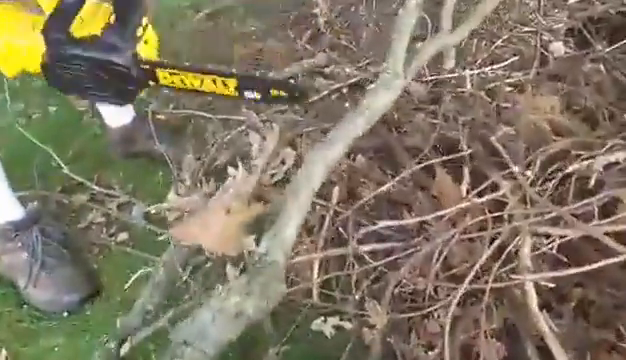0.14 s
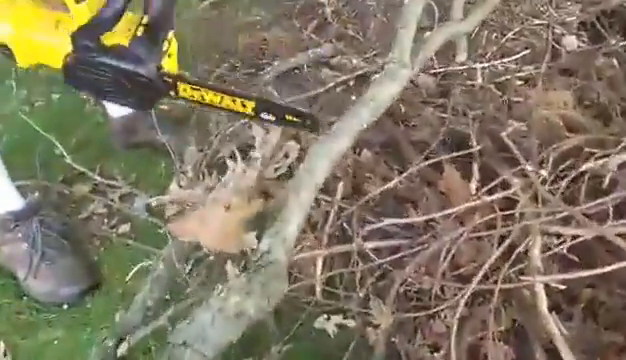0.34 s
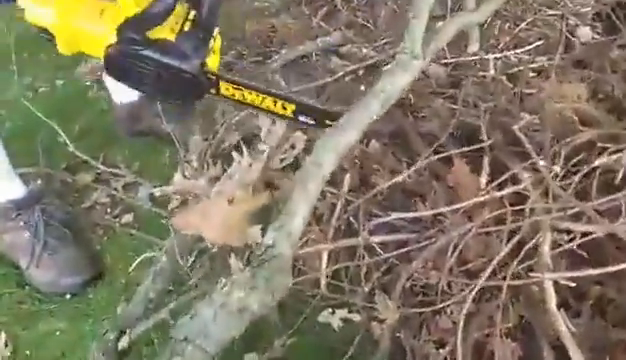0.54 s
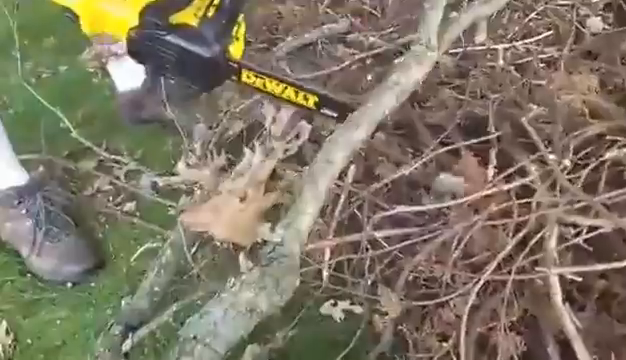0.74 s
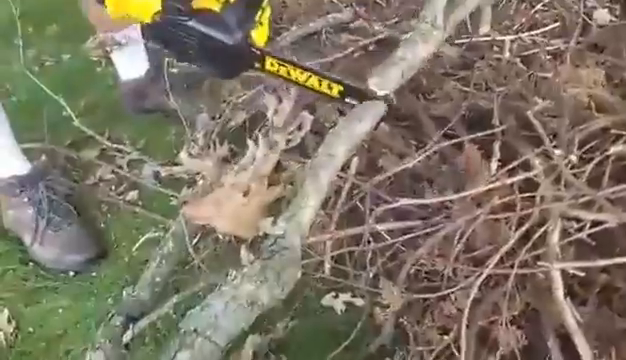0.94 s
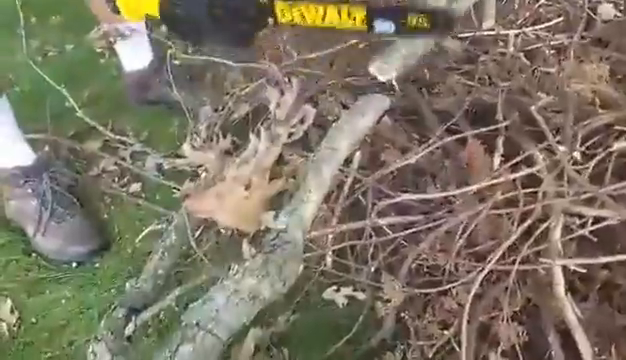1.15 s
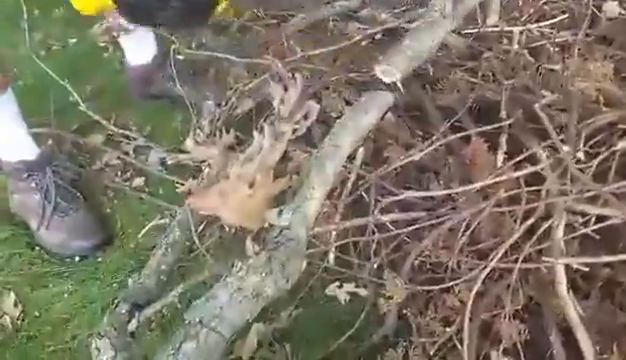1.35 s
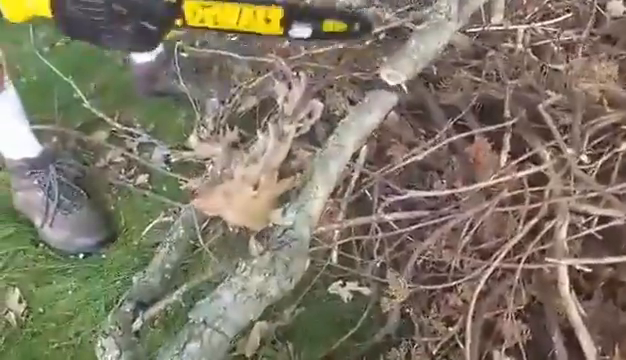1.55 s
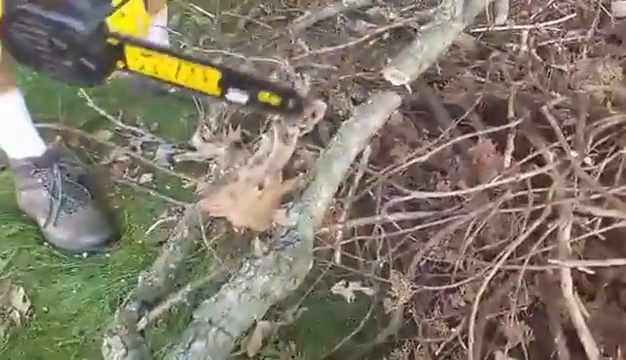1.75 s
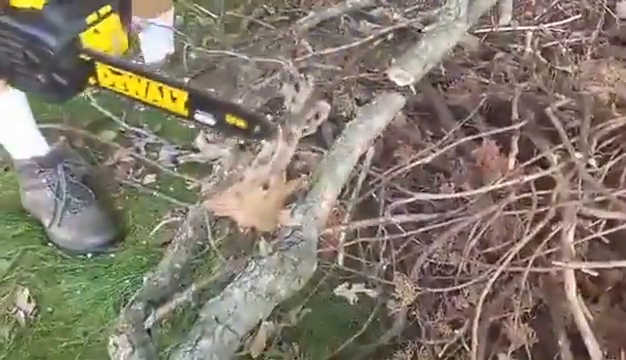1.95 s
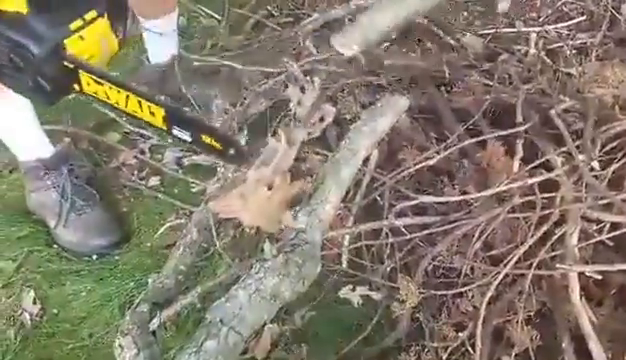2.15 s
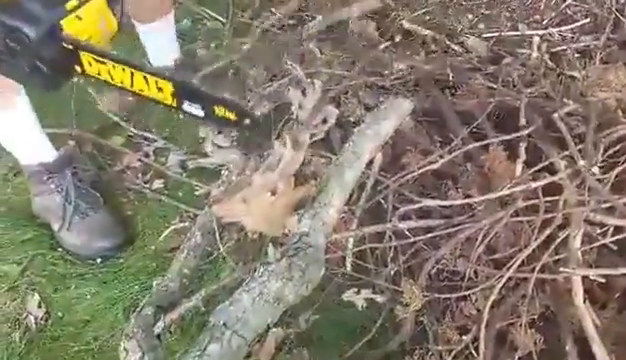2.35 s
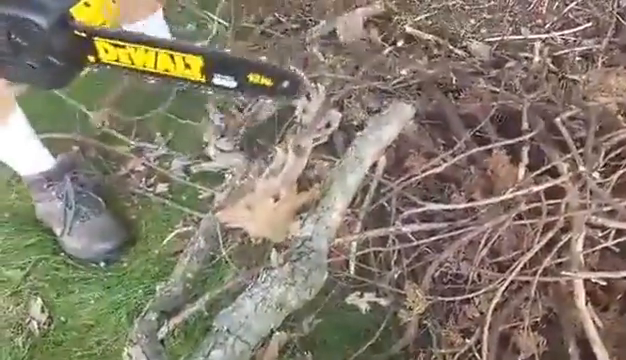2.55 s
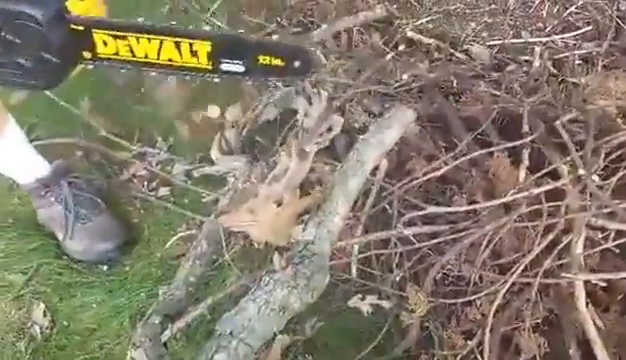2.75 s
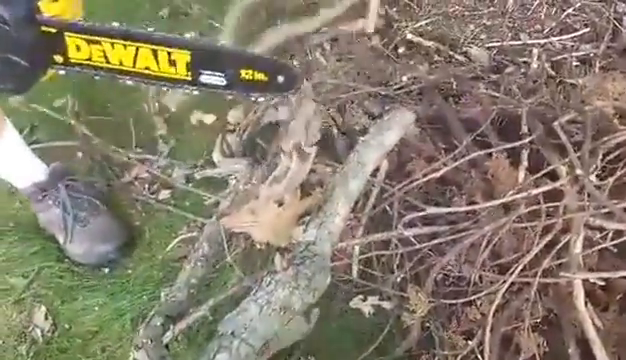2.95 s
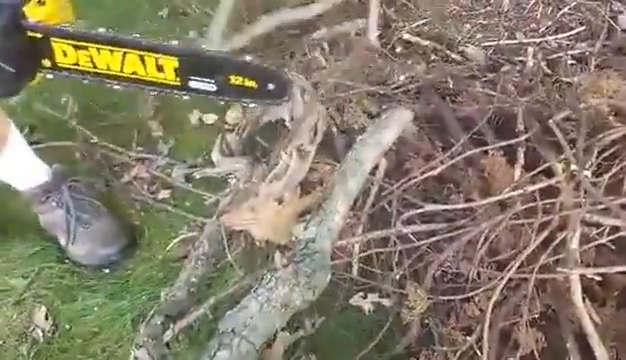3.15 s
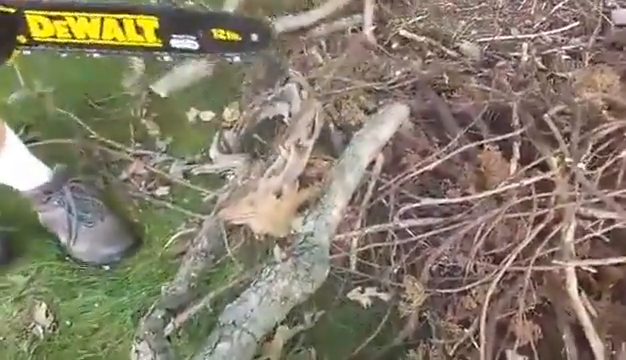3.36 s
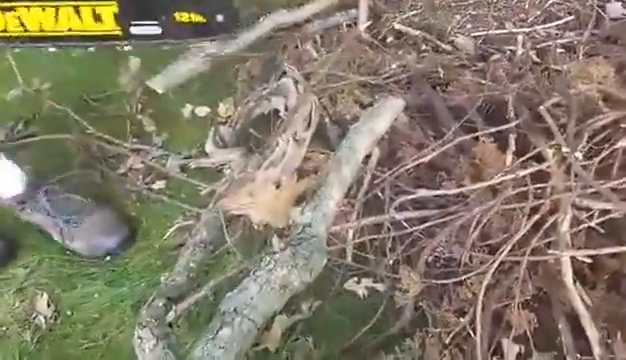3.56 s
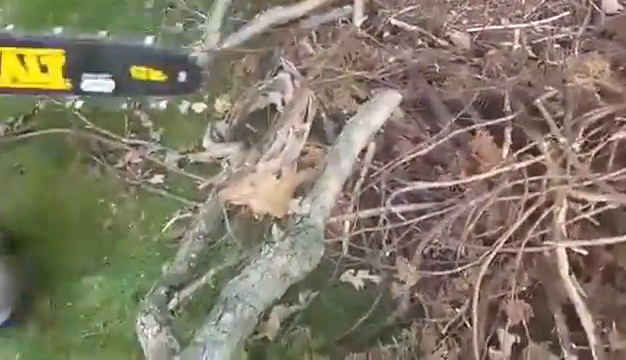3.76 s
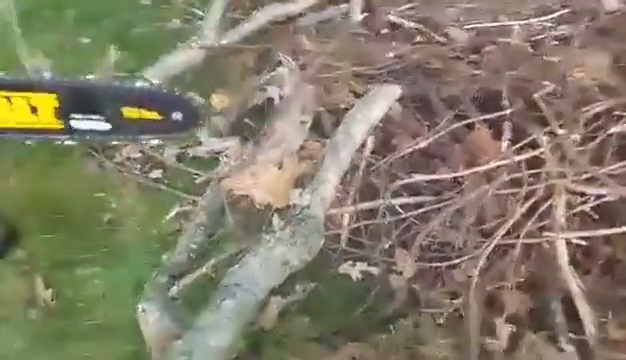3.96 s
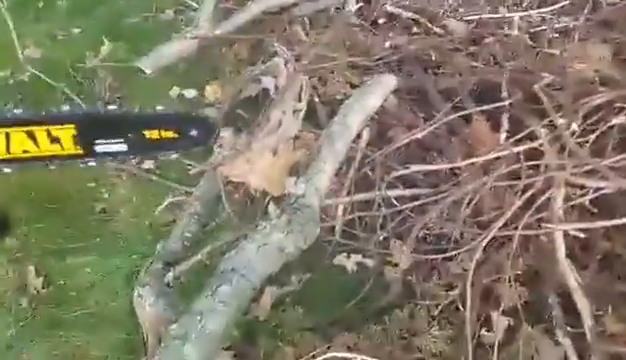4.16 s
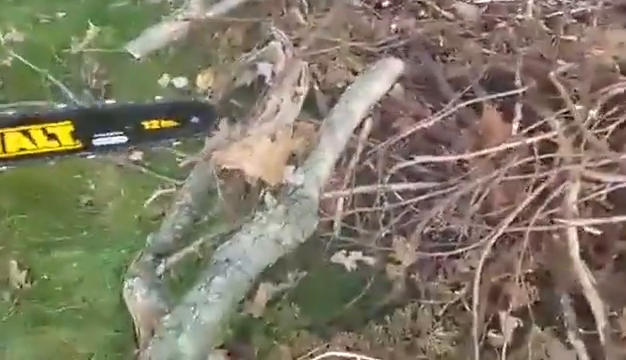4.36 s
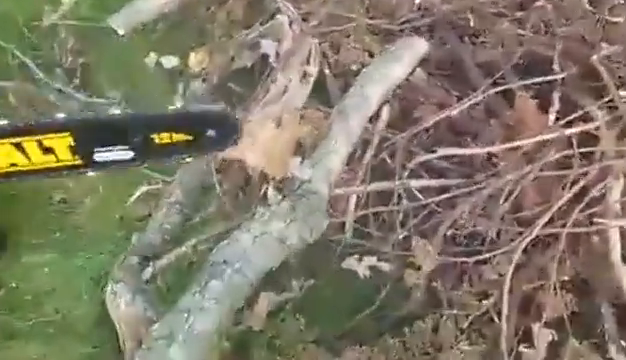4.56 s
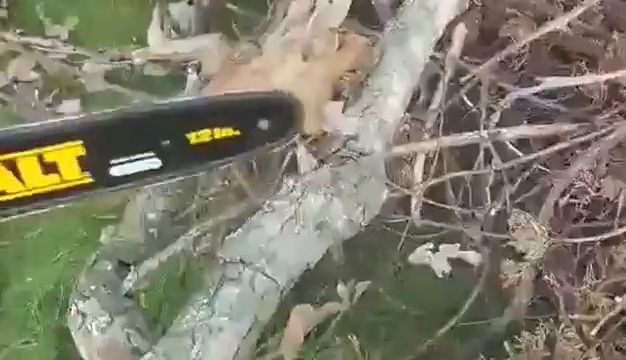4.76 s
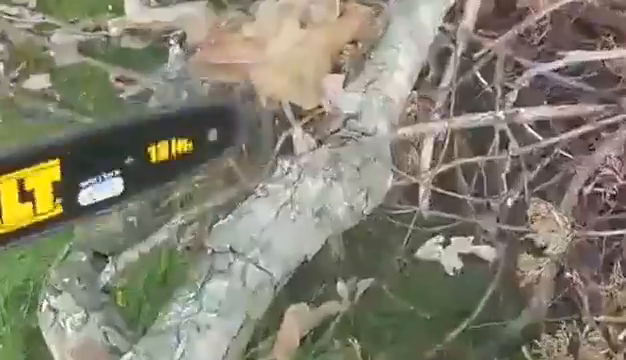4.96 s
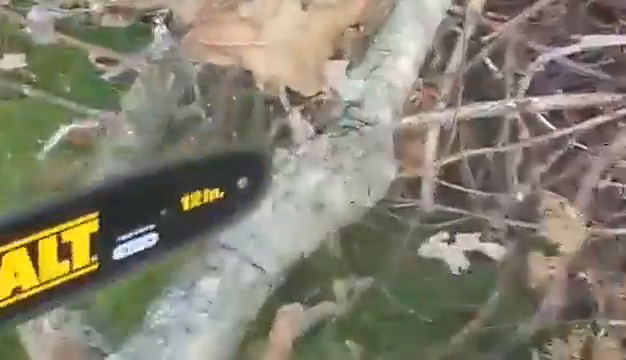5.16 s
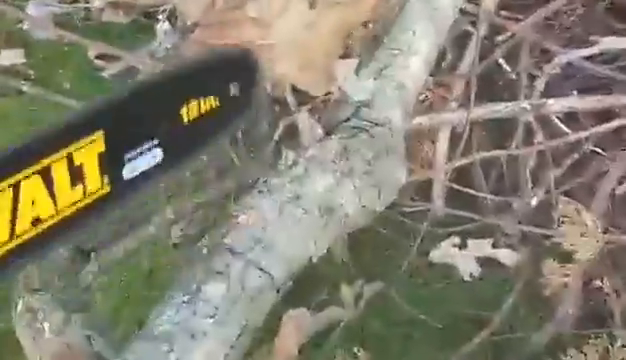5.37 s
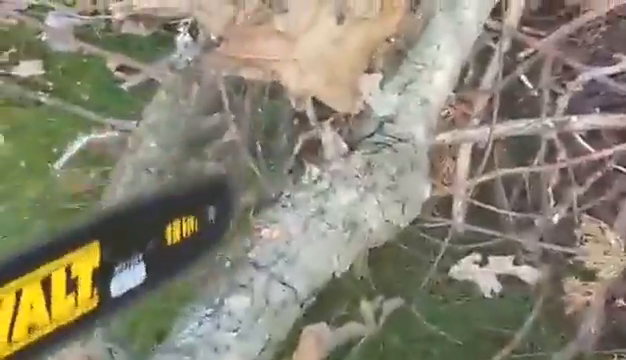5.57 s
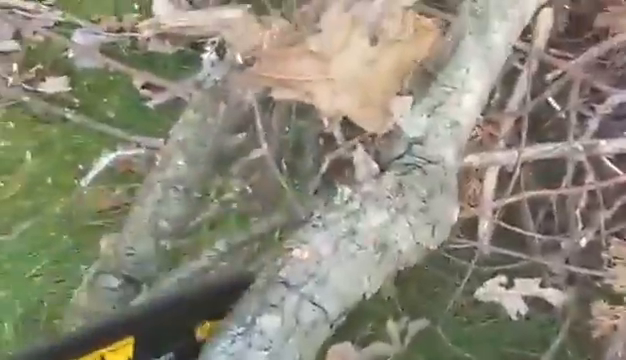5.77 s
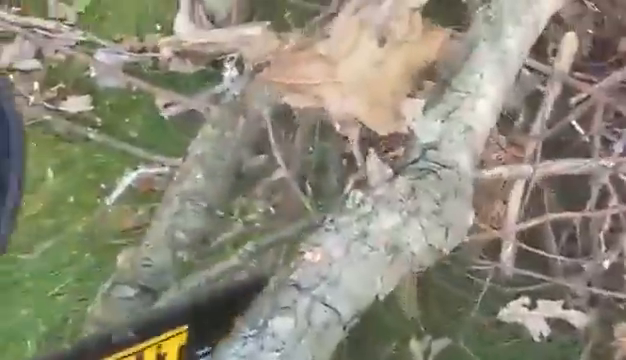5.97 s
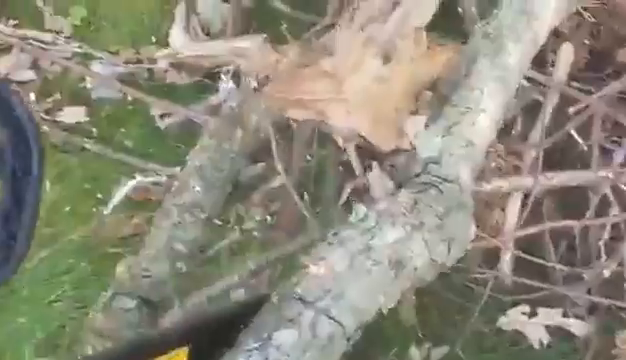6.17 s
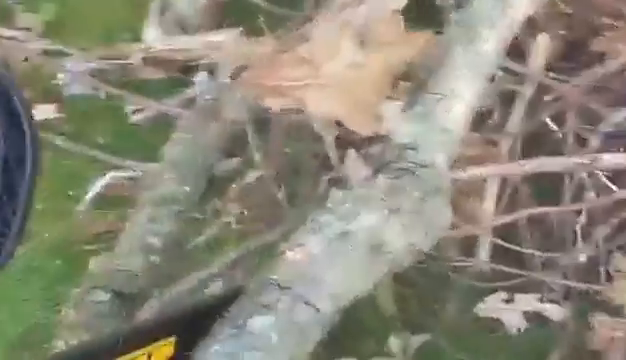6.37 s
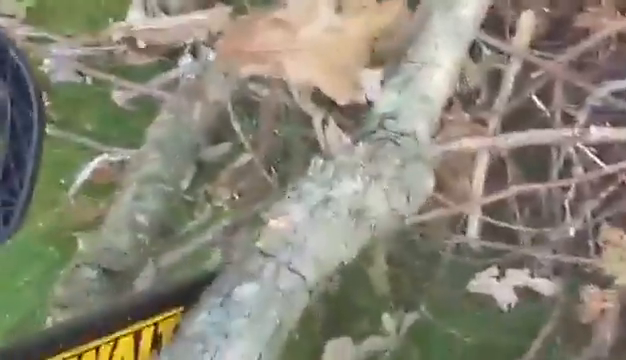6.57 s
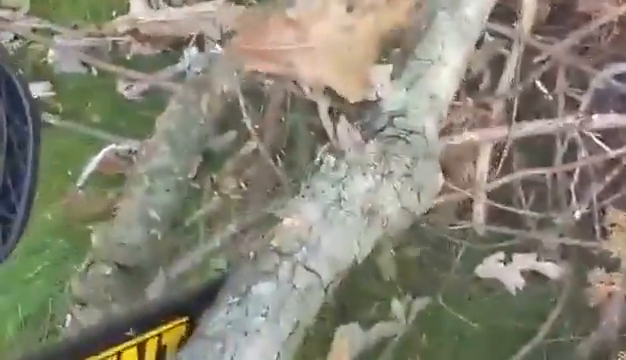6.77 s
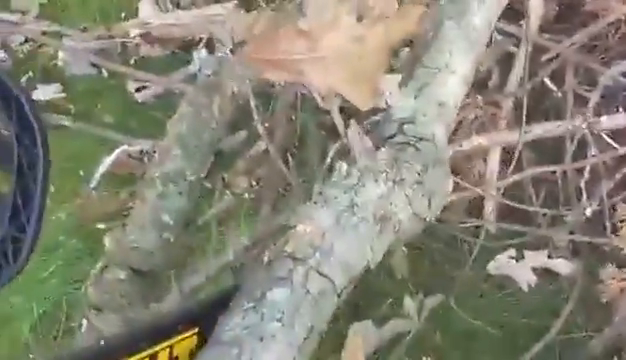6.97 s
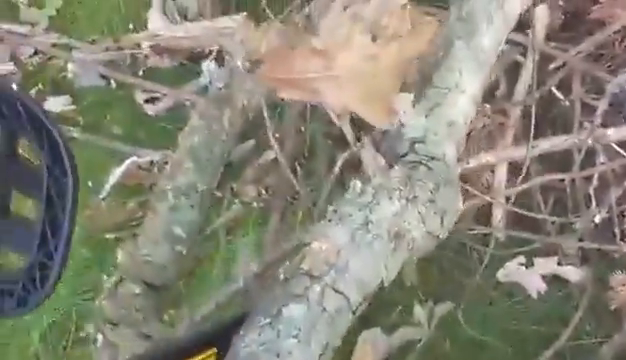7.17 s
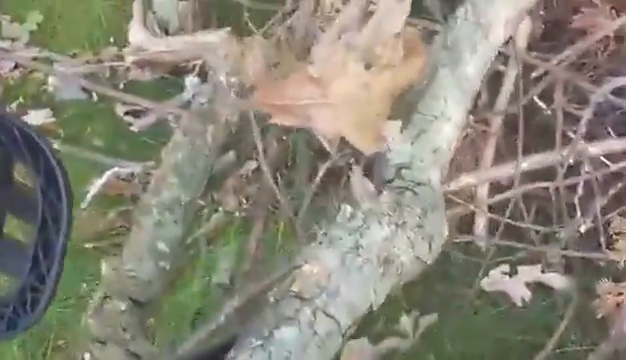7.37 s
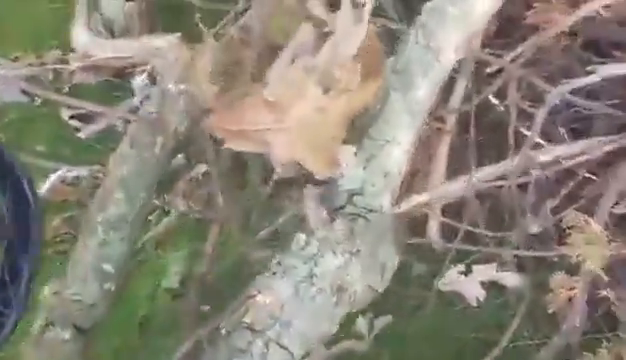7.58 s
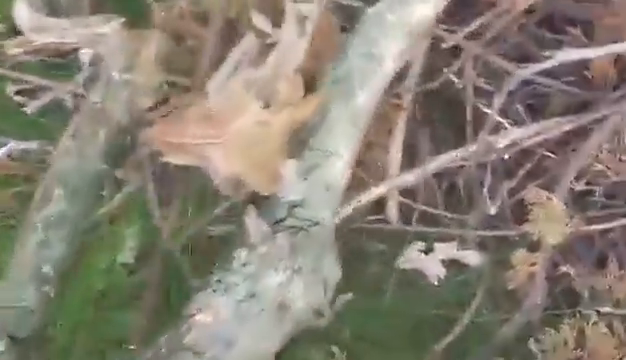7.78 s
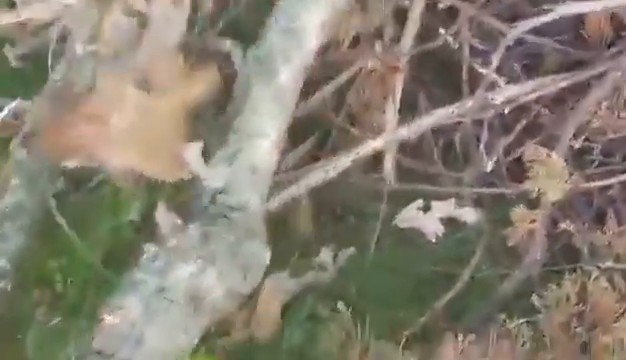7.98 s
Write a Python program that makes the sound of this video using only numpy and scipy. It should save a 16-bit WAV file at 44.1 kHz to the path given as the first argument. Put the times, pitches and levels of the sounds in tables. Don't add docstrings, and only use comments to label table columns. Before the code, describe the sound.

Open yard, close stereo pickup, little reverberation, highest treble missing. Soft traffic rumble and a low distant engine hum lie underneath. At about 0.35 s dry twigs crack. At 0.5 s a battery chainsaw knocks, stutters and runs up in a rising, rattling whine; released at 1.2 s, it falls quickly and stops with a click near 1.5 s. A quiet gap follows with small twig ticks, then from 2.2 to 3.6 s dense dry leaves crunch, a bough scuffs in short swishes, and wood snaps sharply around 2.45 s. Rustling thins, with scattered cracks from 3.9 to 4.8 s. At 4.8 s a hard snap meets the second start: the motor climbs to a steady buzzing whine by 5.5 s. From 5.9 s the chain bites; pitch sags, tone thickens and wavers, with grabbing surges and sharp chip cracks, recovering slightly before ending, still running, at 8 s.

```python
import sys
import numpy as np
from scipy import signal
from scipy.fft import rfft, irfft, next_fast_len
from scipy.io import wavfile
from scipy.ndimage import uniform_filter1d

SR = 44100
rng = np.random.default_rng(int(sys.argv[2]) if len(sys.argv) > 2 else 0)


def put_to_file(sound):
    columns = np.atleast_2d(sound).T
    safe = np.clip(columns, -1, 1)
    whole_steps = np.round(safe * 32767)
    wavfile.write(sys.argv[1], SR, whole_steps.astype(np.int16))


def voltage_ratio(level):
    return 10 ** (np.asarray(level, float) / 20)


N = 353682

FREE_HZ = 354
POLES = 12.2
# (time after the pull [s], motor speed [Hz])
START = [(0, 80), (.03, 73), (.055, 64), (.09, 83), (.125, 133)]


def rms_one(x):
    return x / np.sqrt(np.mean(x ** 2) + 1e-20)


def in_time(rows):
    s, *columns = np.transpose(rows)
    at = np.arange(round(s[0] * SR), min(round(s[-1] * SR), N))
    return at, [np.interp(at / SR, s, c) for c in columns]


def read(points, hz):
    return np.interp(np.log(hz), np.log(np.array(points)[:, 0]), np.array(points)[:, 1])


def at_hz(points, size):
    return read(points, np.arange(size // 2 + 1) * SR / size + 1)


def colour(x, spectrum):
    fold = irfft(np.log(voltage_ratio(at_hz(spectrum, size=4096))))
    fold[1:2048] *= 2
    fold[2049:] = 0
    response = irfft(np.exp(rfft(fold)))[None, :2048]
    return signal.oaconvolve(np.atleast_2d(x), response, axes=1)[:, :np.shape(x)[-1]]


def band(x, lo_hz, hi_hz):
    return signal.sosfilt(signal.butter(2, [lo_hz, hi_hz], "band", fs=SR, output="sos"), x + 1e-18)


def drift(rate_hz, size):
    r = np.exp(-2 * np.pi * rate_hz / SR)
    return rms_one(signal.lfilter([1], [1, -2 * r, r * r], rng.standard_normal(size + 9000))[9000:])


def grains(per_s, spread_db, size):
    sizes = voltage_ratio(spread_db * np.minimum(rng.exponential(1, size), 5)) * rng.choice([-1, 1], size)
    return sizes * (rng.random(size) < per_s / SR)


def place(takes, lag_s):
    # (frequency [Hz], direct share of power [0-1])
    likeness = [(30, 0.38), (200, 0.66), (600, 1), (1500, 0.46), (2500, 0.35), (5000, 0.064), (9000, 0.12)]
    size = next_fast_len(takes.shape[1] + 64)
    share = np.clip(at_hz(likeness, size), 0, 1)
    delay = np.exp(-2j * np.pi * np.arange(size // 2 + 1) * SR / size * np.array([[0], [lag_s]]))
    direct, *scattered = rfft(takes, size)
    both = np.sqrt(share) * delay * direct + np.sqrt(1 - share) * np.array(scattered)
    return irfft(both, size)[:, :takes.shape[1]]


def yard():
    # (frequency [Hz], density [dB per Hz])
    rumble = [(12, -13), (20, -29), (58, -11.5), (76, -12), (96, -6), (155, -4.5), (213, -5.5), (286, -7.5),
              (585, -21.5), (744, -21.5), (805, -22), (2810, -28.5), (11500, -69), (15000, -104),
              (22000, -120)]
    # (time [s], level [dB], half-length [s])
    swells = [(0.703, 5, 0.44), (1.998, 1, 0.25), (3.212, 6, 0.8)]
    # (start [s], end [s], from [Hz], to [Hz], level [dB])
    first_engine = [(0.0, 1.143, 96.5, 96.3, -47), (1.14, 2.227, 93.4, 92.5, -48),
                    (2.101, 2.9, 88.7, 85.4, -48.5)]
    second_engine = [(2.7, 3.102, 136.3, 114.3, -43.5), (3.45, 4.19, 132.5, 130, -46),
                     (3.9, 4.995, 131.2, 134.5, -48.5)]
    # (multiple [1], level [dB])
    hum_overtones = [(1.651, -3.5), (2.002, -20), (8.05, -16)]
    yard_db, fall_from_s, fall_db_per_s, engine_fade_s = -40.5, 4.6, 1.3, 0.13

    t = np.arange(N) / SR
    level_db = yard_db - fall_db_per_s * np.maximum(t - fall_from_s, 0)
    level_db += sum(db * np.exp(-((t - s) / half_s) ** 2) for s, db, half_s in swells)
    takes = rms_one(colour(rng.standard_normal((3, N)), rumble)) * voltage_ratio(level_db - 8.5)
    for rows, overtones in zip((first_engine, second_engine), (hum_overtones, [])):
        for start, end, from_hz, to_hz, hum_db in rows:
            at, (hz,) = in_time([(start, from_hz), (end, to_hz)])
            fade = np.clip(np.minimum(at / SR - start, end - at / SR) / engine_fade_s, 0, 1)
            turn = 2 * np.pi * np.cumsum(hz + 0.74 * drift(10.3, len(at))) / SR
            for multiple, db in [(0.98, 0)] + overtones:
                level = voltage_ratio(hum_db + db + 0.63 * drift(5.1, len(at)))
                takes[0, at] += np.sqrt(2) * fade * level * np.sin(multiple * turn)
    return place(takes, .00002)


def leaves():
    # (time [s], level [dB])
    rustle = [(0.0, -52.5), (.5, -56.5), (1.46, -63), (1.9, -70), (2.1, -58), (2.2, -49.5), (2.32, -45.5),
              (2.43, -37.5), (2.77, -36.5), (2.805, -37), (2.82, -43), (2.845, -42), (2.86, -36),
              (2.96, -39), (3.0, -42.5), (3.1, -37.5), (3.37, -39), (3.63, -50), (3.75, -63), (4.05, -52.5),
              (4.21, -61), (4.44, -67.5), (4.69, -64), (4.83, -48)]
    # (frequency [Hz], density [dB per Hz])
    leaf = [(150, -13), (300, -33), (450, 1), (600, -7), (850, -4), (1100, -7.5), (1450, -3), (1900, -5),
            (2300, -3.5), (2900, -6), (3600, -6), (4800, -4), (6000, 0), (7900, -6.5), (11000, 0.5)]
    out = np.zeros((2, N))
    at, (level_db,) = in_time(rustle)
    size = (3, len(at))
    clumps = voltage_ratio(1.1 * drift(35, len(at)))
    crackle = 0.58 * rms_one(grains(2500 * clumps, 3.0, size)) + 0.63 * rng.standard_normal(size)
    takes = rms_one(band(colour(crackle * clumps, leaf), 610, 6840))
    out[:, at] += place(takes * voltage_ratio(level_db + 4.0), -0.000062)
    return out


def scuffs():
    # (time [s], half-length [s], pitch [Hz], level [dB])
    swishes = [(2.52, .03, 5500, -41), (2.77, .015, 6000, -38), (2.865, .02, 6000, -39),
               (2.94, .02, 6200, -39), (3.152, .016, 2200, -33), (3.21, .03, 2300, -34),
               (3.28, .025, 2500, -38), (3.41, .025, 2500, -41), (3.15, .04, 5600, -41),
               (2.25, .05, 2400, -46)]
    ratio = 1.3
    out, t = np.zeros((2, N)), np.arange(-6000, 6000) / SR
    for (s, half_s, hz, db), noise in zip(swishes, rng.standard_normal((len(swishes), 2, 12000))):
        swish = np.exp(-(t / half_s) ** 2) * rms_one(band(noise, hz / ratio, hz * ratio))
        out[:, round(s * SR) - 6000:][:, :12000] += voltage_ratio(db) * swish
    return out


def snaps():
    # (time [s], peak [dB], brightness [dB], pan [dB]); the first table holds dry twigs and the clacks
    # of trigger, clutch and brake at 0.404, 1.417, 1.453 and 4.821 s
    dry_hits = [(.352, -26, -7.5, -5), (.404, -20.5, -18, 2), (1.417, -21, -28, -5),
                (1.453, -21, -32, -13), (2.16, -33, -2, -4), (2.175, -23, -18, -6), (2.449, -14, -20, 0),
                (2.598, -50, -19, 3), (4.435, -25, -33, -14), (4.72, -15.5, -13.5, -0.5),
                (4.821, -6, -42, -4)]
    twigs = [(.193, -42, -7, 15), (1.951, -40, -16, 21), (1.986, -27.5, -9.5, 5), (2.141, -38, 1, -6),
             (2.331, -24, -25, -6), (2.779, -19, -8, -2.2), (3.856, -27.5, -11.5, -5),
             (3.887, -31, -4.5, -3), (3.96, -15.5, -15, -9), (3.971, -25.5, -23, -32), (4.201, -41, -9, 11),
             (4.635, -33.5, -7, -1), (3.399, -30, -12, 0), (3.53, -35, -15, 3), (4.428, -22.5, -24, -8),
             (4.782, -45, 5, -1), (4.805, -43, -27, 14)]
    bumps = [(.514, -36, -24, -1.2), (1.504, -41, -35, 4), (3.981, -22.5, -26, 7), (4.139, -31.5, -15, 5),
             (4.165, -21.5, -20, 2), (4.693, -28.5, -19, 1)]
    crunches = [(1.7, -40, -10, -5), (2.38, -19.5, -14, -5), (2.501, -26, -1, -7), (2.642, -18.5, -9, -2),
                (2.764, -19, -7, -5), (2.847, -16.5, -7.5, -2), (2.938, -23, -2, -1.2), (3.472, -21, -5, 0),
                (3.998, -26, -3, -4)]
    ticks = [(4.305, -31, -8, 14), (4.437, -14.5, -26, 1.9), (4.494, -30.5, -16, 12),
             (4.561, -16, -16, 16.5)]
    chips = [(5.9167, -19, -14, 0), (6.042, -22, -14, 0), (6.065, -18, -11, 0), (6.3854, -11, -9, -3),
             (6.4471, -9, -14, -4), (6.5722, -14, -14, -2), (6.594, -6, -21, 0), (6.706, -14, -20, -8),
             (6.7823, -7, -22, -3), (6.9492, -17, -20, 0), (7.0118, -14, -17, 0), (7.138, -20, -14, -3),
             (7.2572, -8, -16, 0), (7.2888, -14, -14, -5), (7.8753, -17, -10, 0)]
    # (hits, thump [dB], t60 [ms])
    kinds = [(dry_hits, -29, 23), (twigs, -17, 22), (bumps, -8, 27), (crunches, -23, 110),
             (ticks, -20.5, 4), (chips, -32, 22)]
    creak_s, creak_db = .008, -19
    spike = 9

    out, t = np.zeros((2, N + 4000)), np.arange(4000) / SR - creak_s
    events = [(*hit, thump_db, ms) for hits, thump_db, ms in kinds for hit in hits]
    noise = rng.standard_normal((len(events), 2, 4000))
    for (s, peak_db, bright_db, pan_db, thump_db, ms), burst in zip(events, noise):
        creak = voltage_ratio(creak_db + 30000 * np.minimum(t, 0) / ms)
        decay = voltage_ratio(-60000 * np.maximum(t, 0) / max(ms, 3)) * np.clip(t / ms / 4e-5, .15, 1)
        burst = burst + 0.5 * burst[0] + spike * (ms < 10) * (np.abs(t) < 1 / SR)
        burst = burst * np.where(t < 0, creak, decay)
        wood, thump, tick = band(burst, 540, 3730), band(burst[0], 145, 710), band(burst, 2850, 8800)
        parts = ((wood, -1.5), (thump, thump_db + 9.5), (tick, bright_db + 8.0))
        snap = sum(voltage_ratio(db) * p / np.abs(p).max() for p, db in parts)
        i = round((s - creak_s) * SR)
        out[:, i:i + 4000] += voltage_ratio(peak_db) * snap * voltage_ratio([[pan_db / 2], [-pan_db / 2]])
    return out[:, :N]


def knocks(t60_s=0.032):
    # (time [s], pitch [Hz], peak [dB])
    rings = [(.505, 710, -14.5), (0.507, 1180, -14.5), (1.504, 940, -30), (1.503, 1720, -35),
             (2.448, 1840, -16.5), (4.821, 930, -21), (4.819, 2340, -15.5)]
    out, t = np.zeros(N), np.arange(4000) / SR
    for s, hz, peak_db in rings:
        out[round(s * SR):][:4000] += voltage_ratio(peak_db - 60 * t / t60_s) * np.sin(2 * np.pi * hz * t)
    return out


def catches(t):
    # (time [s], strength [0-1])
    torn = [(6.169, 0.49), (6.441, 0.84), (6.71, 1.07), (6.899, 0.62), (7.15, 0.71), (7.27, 1.09),
            (7.459, .5), (7.58, 0.58), (7.698, 0.55)]
    half_s = .018
    return sum(strength * np.exp(-((t - s) / half_s) ** 2) for s, strength in torn)


def speed(pulled_s, released_s, t):
    # (time [s], link rate [Hz])
    cut_rows = [(5.869, 711), (6.04, 652.7), (6.21, 655.3), (6.45, 613.3), (6.64, 602.7), (7.1, 611.7),
                (7.74, 631.3), (7.839, 666.7), (8.02, 668)]
    ramp_hz_per_s, brake_hz_per_s = 377, 1200
    wobble_hz, wobble_per_s = 2.5, 8
    catch_hz, full_sag_hz = 10.5, 47.3
    knee = 2600

    s, hz = np.transpose(START)
    since_s = t - pulled_s
    run = np.interp(since_s, s, hz) + ramp_hz_per_s * np.maximum(since_s - s[-1], 0)
    s, links = np.transpose(cut_rows)
    cut = np.where(t > s[0], np.interp(t, s, links / 2), FREE_HZ)
    cut = cut + wobble_hz * np.clip((t - s[0]) / .2, 0, 1) * drift(wobble_per_s, len(t))
    hz = np.minimum(np.minimum(run, cut), FREE_HZ)
    hz = np.where(since_s < .3, hz, uniform_filter1d(hz, size=knee))
    hz = hz + catch_hz * catches(t) - brake_hz_per_s * np.maximum(t - released_s, 0)
    return np.maximum(hz, 30), np.clip((FREE_HZ - cut) / full_sag_hz, 0, 1)


def line(turn, db, waver, flutter_db):
    size = len(turn)
    wander = waver * np.cumsum(drift(36.2, size)) / SR
    blur = np.array([0 * turn, 0.31 * drift(9.1, size) + 1, 0.45 * drift(4.4, size) - .8])
    return np.sqrt(2) * voltage_ratio(db + flutter_db * drift(86, size)) * np.sin(turn + wander + blur)


def motor(hz, load, on, housing, kerf_db):
    # (multiple [1], level [dB], added at full load [dB])
    order_db = [(2, 0.1, 0), (3, -1.5, -10), (5, -1.5, -10)]
    coast_db = -5
    flutter_db = 1.5
    slow_db_per_octave, slow_hz = 8, 200

    link_db, third_db, fifth_db = (read(housing, k * hz) + db + load_db * load for k, db, load_db in order_db)
    third_db = third_db + coast_db * ~on
    fifth_db = fifth_db + coast_db * ~on + slow_db_per_octave * np.minimum(np.log2(hz / slow_hz), 0)
    turn = 2 * np.pi * np.cumsum(hz) / SR
    tone = line(2 * turn, link_db + kerf_db, waver=14.4, flutter_db=0.5 + flutter_db * load)
    tone += line(5 * turn, fifth_db, waver=21.7, flutter_db=-0.5)
    for order, db in ((4, -10), (6, -10.5)):
        side_db = fifth_db + db + read(housing, order * hz) - read(housing, 5 * hz)
        tone += line(order * turn, side_db, waver=38.0, flutter_db=7)
    odd = np.sin(3 * turn) + voltage_ratio(-8.5) * np.sin(7 * turn)
    tone += voltage_ratio(third_db + 1.1 + 0.5 * drift(30, len(hz))) * odd
    tone += voltage_ratio(third_db - 9.5) * (hz / 350) ** 4 * np.sin(turn)
    return tone


def whine(hz, load, since_s, on, start_db):
    # (frequency [Hz], level [dB])
    pole_sound = [(1400, -34), (1650, -28), (2150, -25), (2750, -28), (3350, -37), (3750, -40), (4100, -39),
                  (4320, -52)]
    pole_load_db = 3
    stutter_db = start_db - 15 * (since_s < START[1][0])
    level_db = read(pole_sound, POLES * hz) + pole_load_db * load
    level_db = np.where(since_s < START[3][0], stutter_db, level_db)
    tone = on * line(2 * np.pi * np.cumsum(POLES * hz) / SR, level_db, waver=70, flutter_db=3)
    return 0.69 * (tone[0] + tone[1:])


def resonate(x, rings, share):
    out = x.copy()
    for hz, width_hz, db in rings:
        r = np.exp(-np.pi * width_hz / SR)
        zeros = np.array([1, 0, -1]) * (1 - r * r) / 2
        poles = [1, -2 * r * np.cos(2 * np.pi * hz / SR), r * r]
        out += share * (voltage_ratio(db) - 1) * signal.lfilter(zeros, poles, x)
    return out


def chain(at, levels_db, hz, body, rings, on):
    rings_die_hz = (90, 165)
    n_links, n_teeth = 45, 6
    size = (3, len(at))
    count = np.cumsum(2 * hz / SR)
    link = count.astype(int)
    strike = np.diff(link, prepend=0) > 0
    habit = rng.standard_normal(n_teeth)[link % n_teeth] + 0.25 * rng.standard_normal(n_links)[link % n_links]
    blows = strike * (0.21 * habit + 2.0 * rng.standard_normal(size))
    lap = voltage_ratio(0.24 * np.sin(2 * np.pi * count / n_links))
    scrape = rng.standard_normal(size) * voltage_ratio(-10 * (count % 1))
    grit = rms_one(grains(5000, 4.5, size))
    rattle = colour((0.34 * rms_one(blows) + 1.16 * rms_one(scrape) + 0.69 * grit) * lap, body)
    rattle = resonate(rattle, rings, np.where(on, 1, np.interp(hz, rings_die_hz, [0, 1])))
    edges_hz = [(60, 450), (450, 1800), (1800, 3300), (3300, 13000)]
    trims_db = [2.06, 6.04, 8.03, 9.3]
    out = 0
    for (lo, hi), level_db, trim_db in zip(edges_hz, levels_db, trims_db):
        level = voltage_ratio(level_db + trim_db + 0.56 * drift(29.0, len(at)))
        out = out + level * rms_one(band(rattle, lo, hi))
    return out


def saw():
    # (pulled [s], released [s], whine of the stuttering start [dB])
    pulls = [
        (.5, 1.228, -45),
        (4.82, 9.0, -29),
    ]
    # (time [s], level [dB])
    efforts = [
        [(.5, -46), (.508, -26.5), (.53, -30.5), (.722, -23.5), (1.094, -22.5), (1.246, -24.5), (1.378, -26),
         (1.462, -35), (1.49, -52)],
        [(4.82, -31.5), (4.86, -26.5), (5.05, -21.5), (5.36, -23), (5.63, -27.5), (5.95, -25.5), (6.25, -24.5),
         (6.5, -23.5), (8.02, -23.5)],
    ]
    # (level at effort -24 [dB], share of the effort's swing [1])
    all_parts = [
        [(-49, 1.6), (-17, 0.88), (-19.5, 1.24), (-27, 1.08)],
        [(-36.5, 0.74), (-24, 0.76), (-23.5, 1), (-26.5, 0.73)],
    ]
    # (frequency [Hz], level [dB])
    housings = [
        [(300, -55), (440, -46), (520, -27), (700, -27), (850, -38), (1100, -32), (1400, -21), (1750, -23)],
        [(300, -55), (445, -48), (490, -28), (700, -29), (850, -38), (1060, -28), (1350, -34), (1750, -38)],
    ]
    # (frequency [Hz], density [dB per Hz])
    bodies = [
        [(150, -42), (350, -21), (520, -13.5), (900, -14), (1150, -9.5), (1430, -2.5), (1900, -2), (2500, -11),
         (3050, -21), (3300, -17), (4500, 2.5), (5900, -10.5), (8500, -14.5), (11500, -15)],
        [(150, -34.5), (400, -4), (560, -5.5), (830, -12), (1050, -4.5), (1600, 0), (2050, -10.5), (3050, -4),
         (3450, -3.5), (4200, -15), (5300, -18), (7900, -14.5), (9000, -18.5), (11500, -19)],
    ]
    # (frequency [Hz], width [Hz], gain [dB])
    all_rings = [
        [(1290, 140, 3.5), (1400, 82, 3), (1750, 43.4, 18.5), (2090, 86, 2.5), (2943, 75, 13), (5980, 740, 9.5)],
        [(1072, 59, 4), (1368, 18, 7.5), (1723, 230, 6.5), (2196, 120, 2.5), (2890, 135, 3), (7940, 90, 0)],
    ]
    lags_s = [.00009, 0.000154]
    load_dbs = [2.66, 2.47, 0.17, 0.041]
    octave_dbs = [0.19, 0.24, 0.058, 1.25]
    catch_dbs = [3, 3.5, 1.5, 1.2]
    # (time [s], pole whine [Hz])
    rotor = [(5.9, 4319), (6.08, 4040), (6.35, 3910), (6.54, 3720), (6.9, 3750), (7.5, 3770), (7.73, 3860),
             (7.84, 4085), (8.02, 4090)]
    # (time [s], level [dB])
    kerf = [(5.87, 0), (6.0, 1), (6.2, 4), (6.42, 2), (6.6, 5.5), (6.9, 5.5), (7.3, 4.5), (7.6, 5),
            (8.02, 5.5)]
    thud_bumps_db = 2
    bite_gain = 2.5

    out = np.zeros((2, N))
    per_pull = zip(pulls, efforts, all_parts, housings, bodies, all_rings, lags_s)
    for (pulled_s, released_s, start_db), rows, parts, housing, body, rings, lag_s in per_pull:
        at, (effort_db,) = in_time(rows)
        t = at / SR
        on = t < released_s
        hz, load = speed(pulled_s, released_s, t)
        octaves, torn = np.log2(hz / FREE_HZ), catches(t)
        levels_db = [db + share * (effort_db + 24) + load_db * load + octave_db * octaves + catch_db * torn
                     for (db, share), load_db, octave_db, catch_db
                     in zip(parts, load_dbs, octave_dbs, catch_dbs)]
        levels_db[0] = levels_db[0] + thud_bumps_db * load * drift(14.0, len(at))
        bite = np.minimum(bite_gain * load, 1)
        takes = chain(at, levels_db, hz, body, rings, on)
        takes += motor(hz, bite, on, housing, np.interp(t, *np.transpose(kerf)))
        rotor_hz = np.where(t > rotor[0][0], np.interp(t, *np.transpose(rotor)) / POLES, hz)
        out[:, at] += whine(rotor_hz, bite, t - pulled_s, on, start_db)
        out[:, at] += place(takes, lag_s)
    return out


def scene():
    return yard() + leaves() + scuffs() + snaps() + knocks() + saw()


def dropouts(x):
    # (frequency [Hz], share of time [0-1])
    drops = [(1850, 0), (2000, .05), (2200, 0), (3300, .02), (3550, .1), (3700, 0), (4200, 0), (4500, .08),
             (4900, .06), (5300, .3), (5800, .05), (8800, .02), (9600, .15), (10600, .3), (11200, .55),
             (11600, .8)]
    # (from [s], to [s], from [Hz], to [Hz])
    gaps = [(5.53, 5.59, 3420, 3640), (5.61, 5.66, 5230, 5680), (5.72, 5.8, 3580, 3780),
            (5.79, 5.87, 4950, 5400), (5.94, 6.0, 5100, 5400), (5.93, 5.99, 1900, 2100),
            (6.61, 6.71, 5130, 5330), (6.87, 6.92, 4930, 5330), (7.03, 7.07, 5130, 5480),
            (7.37, 7.46, 3500, 3620), (7.46, 7.56, 3380, 3680), (7.61, 7.75, 3460, 3650),
            (7.74, 7.8, 5530, 5720), (7.79, 7.83, 5200, 5420), (7.88, 8.0, 5260, 5430)]
    starved_from_s, early_share = 5.45, .12
    hz, s, cells = signal.stft(x, SR, nperseg=1024)
    draw = rng.random((len(hz) // 3 + 1, len(s) // 4 + 1)).repeat(3, axis=0).repeat(4, axis=1)
    hz = hz[:, None]
    share = np.interp(hz, *np.transpose(drops)) * np.where((hz < 6000) & (s < starved_from_s), early_share, 1)
    keep = draw[:len(hz), :len(s)] > share
    for start, end, lo_hz, hi_hz in gaps:
        in_band = (hz > lo_hz - 40) & (hz < hi_hz + 40)
        keep &= ~(in_band & (s > start - .012) & (s < end + .012))
    return signal.istft(cells * keep, SR, nperseg=1024)[1][:, :N]


def splashes():
    # (time [s], level [dB])
    peaks = [(0.3707, -71), (0.5617, -56), (0.8072, -54), (1.2088, -53), (1.6448, -70), (2.0798, -61),
             (2.5153, -55), (2.9174, -59), (3.9889, -55), (4.6255, -62), (4.8455, -53), (5.0605, -53),
             (5.2616, -52), (5.6971, -45), (5.8931, -59), (6.1321, -59), (6.7512, -50), (6.9697, -51),
             (7.1732, -54), (7.8407, -48)]
    trim_db = -2
    out, t = np.zeros(N + 2000), np.arange(-1000, 1000) / SR
    for (s, db), noise in zip(peaks, rng.standard_normal((len(peaks), 2000))):
        hiss = rms_one(band(band(noise, 15000, 15700), 15000, 15700))
        out[round(s * SR) - 700:][:2000] += voltage_ratio(db + trim_db) * np.exp(-(t / 0.0041) ** 2) * hiss
    return out[:N]


def top_cut(x):
    return signal.sosfilt(signal.butter(12, 15830, fs=SR, output="sos"), x)


def record(dry):
    # (frequency [Hz], left over right [dB])
    left_bias = [(60, 5.5), (400, 2.5), (1700, -1), (2400, 6), (2900, 8), (3600, 1.5), (5000, -1.5),
                 (6800, 4), (9000, 0.5), (11000, 1)]
    round_at, top_hz = .85, 11600
    bias = np.array(left_bias)
    x = np.vstack([colour(dry[0], bias * [1, .5]), colour(dry[1], bias * [1, -.5])])
    x = x / (1 + (x / round_at) ** 4) ** 0.29
    x = signal.sosfilt(signal.ellip(10, 1, 80, top_hz, fs=SR, output="sos"), x)
    return top_cut(dropouts(x) + splashes())


dry = scene()
out = record(dry)
put_to_file(out)
```